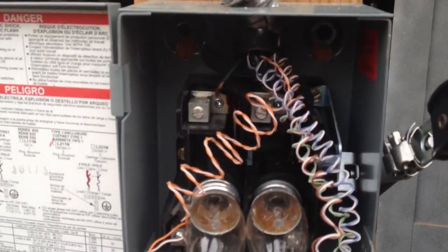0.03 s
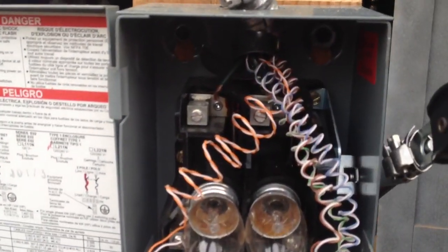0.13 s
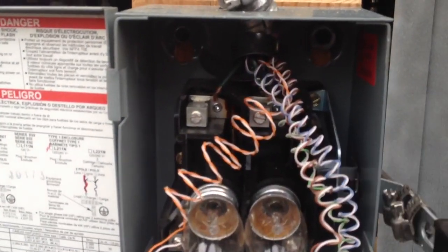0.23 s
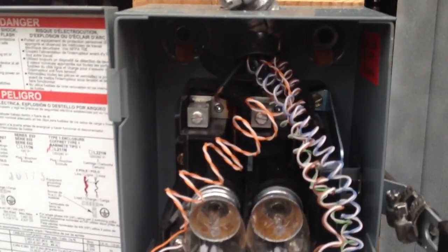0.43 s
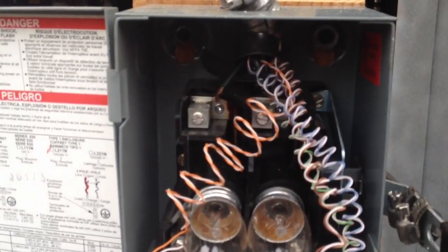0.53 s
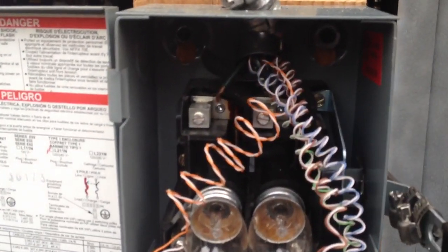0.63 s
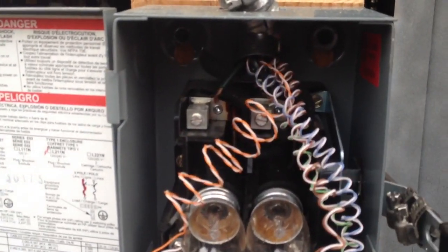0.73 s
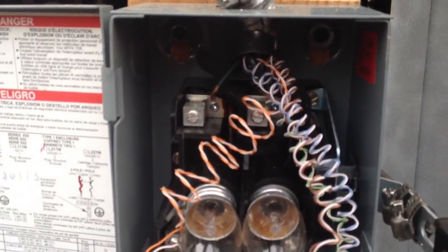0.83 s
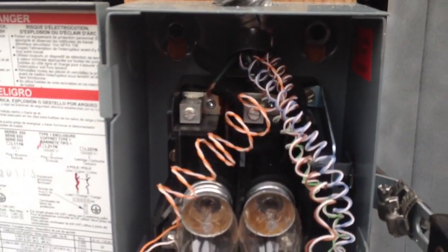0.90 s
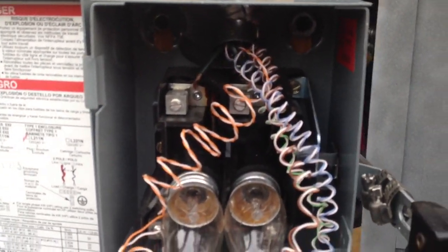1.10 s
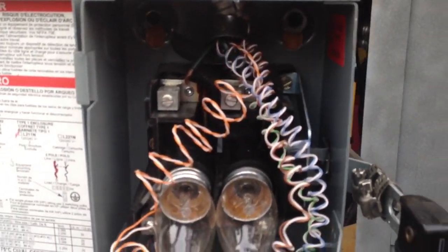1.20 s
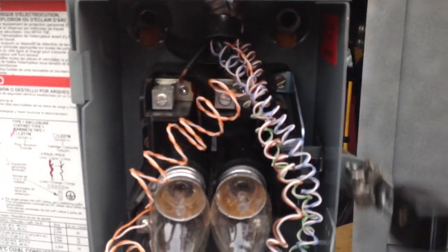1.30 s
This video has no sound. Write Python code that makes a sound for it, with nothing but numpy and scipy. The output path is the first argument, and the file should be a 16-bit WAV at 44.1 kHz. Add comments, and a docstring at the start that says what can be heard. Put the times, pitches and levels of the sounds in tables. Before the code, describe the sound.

Close up in a small room, an electrical switch snaps over with two quick metal clacks, leaving its steel box ringing faintly. Ventilation murmurs quietly underneath, and a second later air begins hissing with a soft thump.

```python
"""A low murmur of ventilation with a thin whine fills a small room. Close by, the lever of a safety
switch is thrown on an open steel box: the spring trips with a rattling clack, the blades squeak over
their jaws and slam into the stop, and the steel rings on faintly. Gain control ducks the room noise
after the clacks. The hand rubs faintly on the lever; a second after the throw, air starts to hiss
with a soft thump."""
import sys
import numpy as np
from scipy import signal
from scipy.fft import rfft, irfft
from scipy.io import wavfile
from scipy.ndimage import uniform_filter1d

SR = 44100
rng = np.random.default_rng(int(sys.argv[2]) if len(sys.argv) > 2 else 0)


def dump(signal):
    """Clip the signal to [-1, 1] and save it as 16-bit WAV at the path in sys.argv[1]."""
    limited = np.clip(np.atleast_2d(signal).T, -1, 1)
    pcm = np.round(limited * 32767).astype(np.int16)
    wavfile.write(sys.argv[1], SR, pcm)


N = 59535


def amp(db):
    """Decibels to gain."""
    return 10 ** (np.asarray(db) / 20)


def lookup(points, hz):
    """Table value on a log-frequency axis."""
    f, value = np.transpose(points)
    return np.interp(np.log(hz + 1), np.log(f + 1), value)


def since(start_s):
    """Seconds since the start, zero before it."""
    return np.maximum(np.arange(N) / SR - start_s, 0)


def highpass(x, hz):
    """Fourth-order bass cut."""
    return signal.sosfilt(signal.butter(4, hz, "high", fs=SR, output="sos"), x)


def noise(spectrum, treble_db=0, shelf_hz=9500):
    """Coloured noise at unit rms, then a treble shelf."""
    hz = np.fft.rfftfreq(N, 1 / SR)
    colour = amp(lookup(spectrum, hz))
    colour /= np.sqrt(np.mean(colour ** 2))
    shelf = amp(treble_db / (1 + (shelf_hz / (hz + 1)) ** 4))
    return irfft(rfft(rng.standard_normal(N)) * colour * shelf, N)


def wavering(tones):
    """Tones whose wandering phase widens their lines."""
    total = np.zeros(N)
    for hz, width_hz, db in tones:
        drift = np.cumsum(rng.standard_normal(N)) * np.sqrt(2 * np.pi * width_hz / SR)
        total += amp(db) * np.sin(2 * np.pi * hz * since(0) + drift)
    return total


def ring(pitches_hz, modes, start_s, build_s=.0015):
    """Struck modes: fast build-up, exponential decay."""
    t = since(start_s)
    partials = sum(amp(db - 60 * t / t60) * np.sin(2 * np.pi * hz * t)
                   for hz, (db, t60) in zip(pitches_hz, modes))
    return -np.expm1(-t / build_s) * partials


def reflections(x, decay, onset_s=.006):
    """Dense echoes, each band dying at its own rate."""
    hz, t, bands = signal.stft(rng.standard_normal(SR), SR, nperseg=256)
    bands = bands * amp(-60 * t / lookup(decay, hz)[:, None])
    taps = signal.istft(bands, SR, nperseg=256)[1]
    taps *= np.minimum(np.arange(len(taps)) / SR / onset_s, 1)
    return signal.fftconvolve(x, taps / np.linalg.norm(taps))[:N]


# Murmur spectrum: (frequency [Hz], relative density [dB])
MURMUR = [(25, -35), (60, -19), (100, -7.5), (150, 1.5), (260, 2), (420, -5), (650, -12), (1100, -12.5),
          (2000, -25), (3100, -31), (4000, -28.5), (5500, -33.5), (7800, -31.5), (9600, -43), (12000, -37),
          (15000, -33.5)]
# Whine: (frequency [Hz], width [Hz], level [dB])
WHINE = [(3760, 65, -81)]

def ventilation(murmur_db=-55.5):
    """Steady low murmur with a thin whine."""
    return amp(murmur_db) * noise(MURMUR) + wavering(WHINE)


# Low knocks: (time [s], level [dB])
KNOCKS = [(0.1918, -39), (0.212, -37), (.267, -32.5)]
# Whole-box modes: (frequency [Hz]) and (level [dB], t60 [s])
BODY_HZ = [175, 238, 290, 385]
BODY_MODES = [(-11.5, 0.75), (-6, 0.2), (1, 0.1), (1, .08)]

def box_knocks():
    """Jolts ring the low modes of the whole box."""
    return sum(amp(db) * ring(BODY_HZ, BODY_MODES, start_s) for start_s, db in KNOCKS)


# Mechanism blows: (time [s], clatter [dB], treble shelf [dB], walls [dB], contacts [dB], frame [dB])
BLOWS = [(0.1919, -37, 13, -44, -56, -56.5), (0.2044, -55.5, -8, -23, -56.5, -55.5),
         (0.2112, -24, -8, -36.5, -24.5, -46), (0.2135, -24.5, -6, -16.5, -27.5, -38.5),
         (0.2205, -12, 1, -16, -16, -32), (0.2244, -5, -7, -6, -4, -24), (0.2283, -6, -2, -19, -10, -27),
         (0.2324, -11, -7.5, -18, -19, -27), (0.2392, -19, -8.5, -30, -26, -37),
         (0.2641, -4.5, -1, -20, -28, -17), (0.2667, -3, 3.5, -6.5, -24, -2),
         (0.2712, -16, 4, -36, -28, -7), (0.2834, -25.5, 3, -42.5, -41, -36)]
# Dense modes of the steel parts: (frequency [Hz], relative density [dB])
CLATTER = [(40, -40.5), (130, -23.5), (300, -4.5), (540, -6), (950, 1), (1900, -4.5), (2450, 0.5),
           (3400, -8.5), (4600, -2), (6700, -7), (8600, -9), (10200, -17.5), (13000, -16.5), (14800, -12.5)]
# Box wall, contact, blade frame and spring modes: (frequency [Hz]) and (level [dB], t60 [s])
WALL_HZ = [727, 752, 779]
WALL_MODES = [(-5, .055), (-2, .055), (-8, .05)]
CONTACT_HZ = [1480, 1760, 1808, 2052, 2442, 4416, 4588, 5447, 6130, 6610]
CONTACT_MODES = [(-14, .06), (-7, .028), (0, .034), (-9, .04), (-9, .055), (-13, .06), (-14, .06),
                 (-14, .06), (-14, .055), (-15, .05)]
FRAME_HZ = [1120, 1355, 1408, 1554, 2778, 4760, 5450, 6880, 7972]
FRAME_MODES = [(0, .04), (-7, .05), (-10, .07), (-10, .06), (-16, .08), (-13, .06), (-16, .06), (-18, .08),
               (-18, .07)]
SPRING_HZ = [900, 2272, 4167]
SPRING_MODES = [(-43, .95), (-44, .38), (-56, .35)]
# Box cavity decay: (frequency [Hz], t60 [s])
CAVITY_DECAY = [(200, .26), (550, .17), (1200, .18), (2600, .15), (5000, .15), (9000, .14), (13500, .13),
                (14700, .19)]

def clacks(rise_s=.0004, clatter_t60_s=.035, cavity_db=-11, panel_cut_hz=370):
    """Blows rattle and ring the steel, the spring sings on; thin panels radiate little bass."""
    clatter = np.zeros(N)
    rings = ring(SPRING_HZ, SPRING_MODES, start_s=.267)
    for start_s, clatter_db, treble_db, walls_db, contacts_db, frame_db in BLOWS:
        t = since(start_s)
        envelope = np.minimum(t / rise_s, 1) * amp(clatter_db - 60 * t / clatter_t60_s)
        clatter += envelope * noise(CLATTER, treble_db)
        rings += amp(walls_db) * ring(WALL_HZ, WALL_MODES, start_s)
        rings += amp(contacts_db) * ring(CONTACT_HZ, CONTACT_MODES, start_s)
        rings += amp(frame_db) * ring(FRAME_HZ, FRAME_MODES, start_s)
    cavity = amp(cavity_db) * reflections(clatter, CAVITY_DECAY)
    return highpass(clatter + cavity + rings, panel_cut_hz)


# Squeak tones: (frequency [Hz], width [Hz], level [dB])
SQUEAK = [(1753, 120, -18.5), (5200, 60, -18.5), (8000, 100, -22.5)]

def blade_squeak(start_s=.2495, length_s=.013, edge_s=.0025):
    """Blades slide over their jaws between the two clacks."""
    t = since(start_s)
    attack = np.minimum(t / edge_s, 1)
    release = np.exp(-np.maximum(t - length_s, 0) / edge_s)
    return attack * release * wavering(SQUEAK)


# Rub spectrum: (frequency [Hz], relative density [dB])
RUB = [(200, -10), (800, -6), (1500, 8), (2500, -26), (5500, -13), (7300, 7.5), (8300, -16), (10000, -28)]

def hand_rub(peak_s=.98, half_width_s=.094, peak_db=-77.5):
    """Faint friction of the hand on the lever swells and fades."""
    swell = np.exp(-((since(0) - peak_s) / half_width_s) ** 2)
    return amp(peak_db) * swell * noise(RUB)


# Jet and puff spectra: (frequency [Hz], relative density [dB])
JET = [(50, -29.5), (200, -23), (700, -10), (1800, -9.5), (3000, -19), (3700, -9.5), (4400, 0),
       (4900, -3.5), (5400, -6.5), (7900, -9.5), (9000, -20.5), (10200, -26.5), (12400, -10), (15000, -15)]
PUFF = [(100, -15), (600, -4.5), (1300, 0.5), (1800, -4), (2100, 0.5), (2350, 3.5), (2700, -32), (6000, -4),
        (15000, -56)]
# Thump modes: (frequency [Hz]) and (level [dB], t60 [s])
THUMP_HZ = [162, 213, 288, 355]
THUMP_MODES = [(-41.5, 0.16), (-35, 0.1), (-39, 0.066), (-43.5, 0.095)]

def air(start_s=1.189, rise_s=.012):
    """The flow starts with a thump and a puff, then settles to a hiss."""
    jet_db, surge_db, settle_s = -61, 14, .17
    puff_db, puff_t60_s = -52, .4
    t = since(start_s)
    jet = noise(JET) * amp(jet_db + surge_db * np.exp(-t / settle_s))
    puff = noise(PUFF) * amp(puff_db - 60 * t / puff_t60_s)
    thump = ring(THUMP_HZ, THUMP_MODES, start_s, build_s=.0038)
    return np.minimum(t / rise_s, 1) * (jet + puff) + thump


# Room decay: (frequency [Hz], t60 [s])
ROOM_DECAY = [(150, .5), (530, .31), (1400, .33), (2600, .29), (4500, .32), (7000, .31), (10000, .24),
              (15000, .24)]

def scene(room_db=-24.5):
    """Mono mix; only the switch excites the room."""
    switch = box_knocks() + clacks() + blade_squeak()
    room = amp(room_db) * reflections(switch, ROOM_DECAY)
    return (switch + room + air() + hand_rub() + ventilation())[None]


def record(dry):
    """Gain control falls fast and recovers slowly; then soft clipping and band limits."""
    threshold_db, duck_share, recovery_db_per_s = -15.5, .54, 11
    ceiling, low_cut_hz, high_cut_hz = .75, 92, 15150
    power_db = 10 * np.log10(abs(uniform_filter1d(dry[0] ** 2, size=200)) + 1e-12)
    recovery_db = since(0) * recovery_db_per_s
    held_db = np.maximum.accumulate(power_db + recovery_db) - recovery_db  # decaying peak hold
    over_db = np.maximum(held_db - threshold_db, 0)
    ducked = dry * amp(-duck_share * uniform_filter1d(over_db, size=100))
    rounded = ducked / (1 + (ducked / ceiling) ** 4) ** .25
    lowpass = signal.firwin(301, high_cut_hz, window=("kaiser", 9), fs=SR)
    return signal.oaconvolve(highpass(rounded, low_cut_hz), lowpass[None], "same")


dry = scene()
out = record(dry)
dump(out)
```